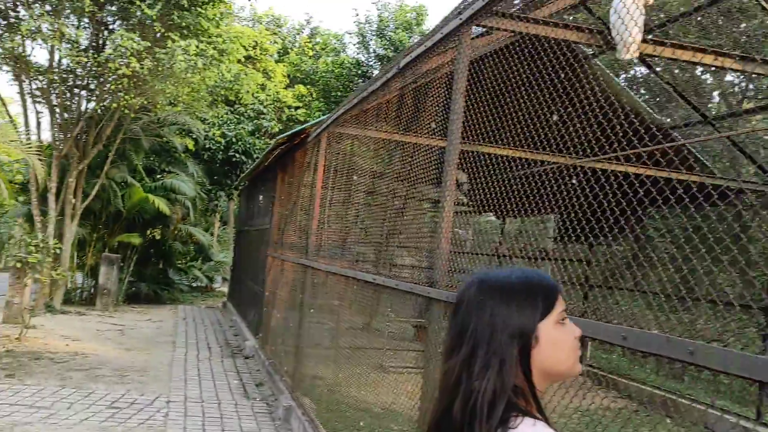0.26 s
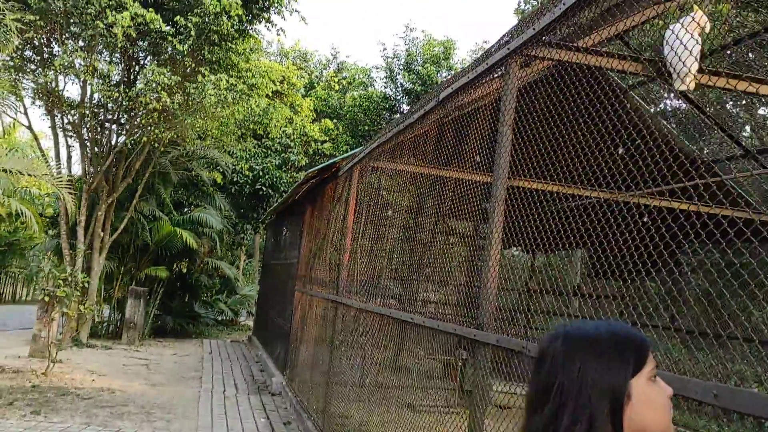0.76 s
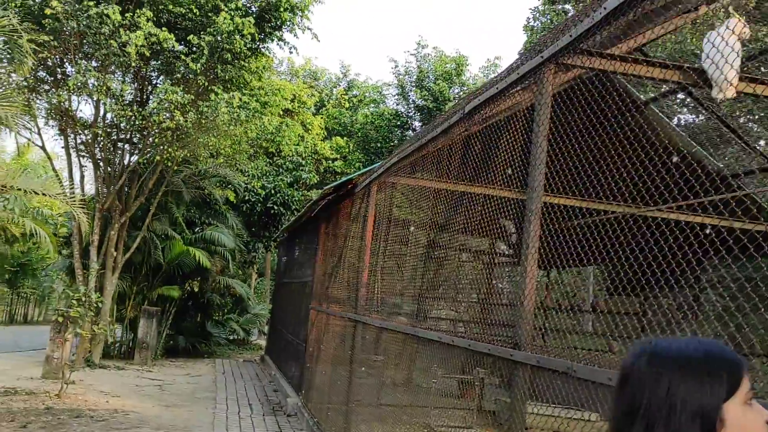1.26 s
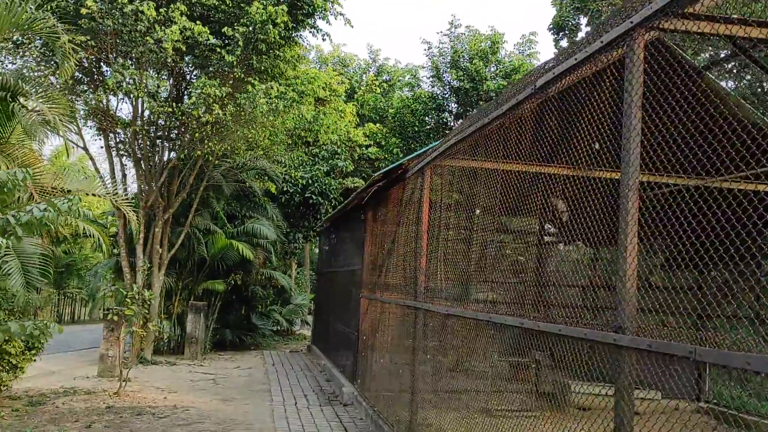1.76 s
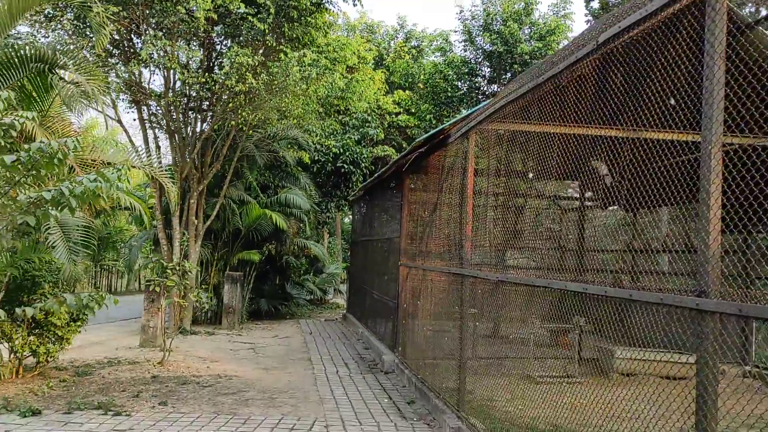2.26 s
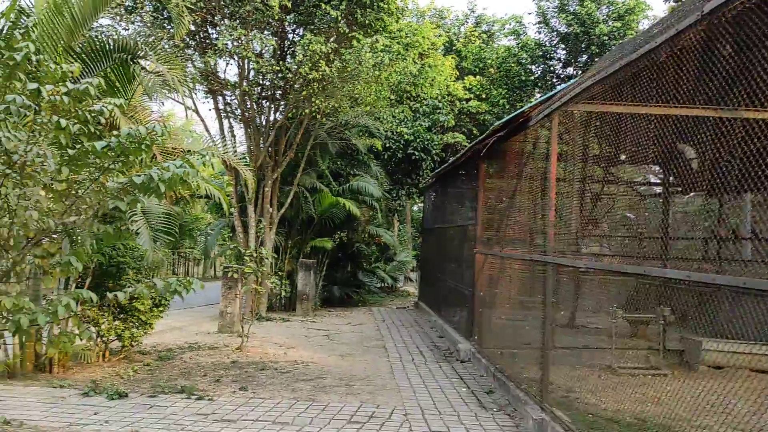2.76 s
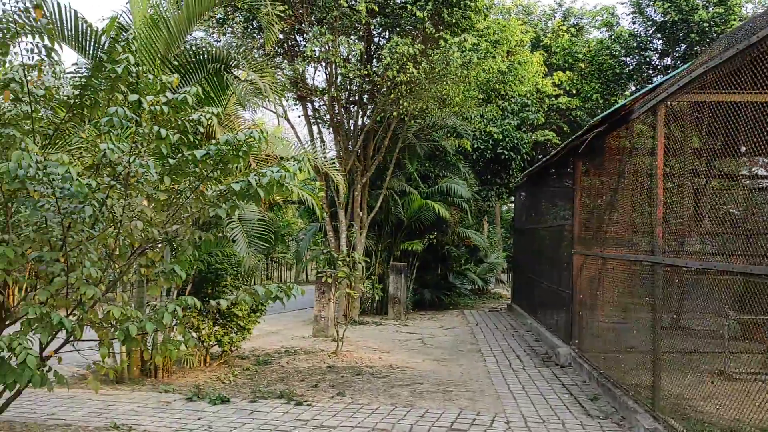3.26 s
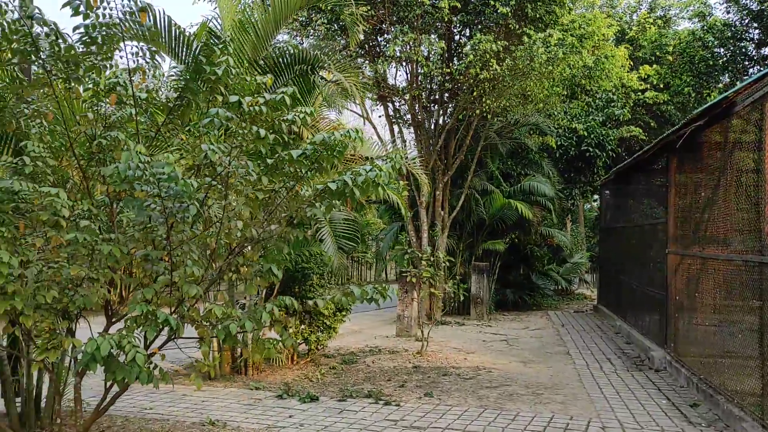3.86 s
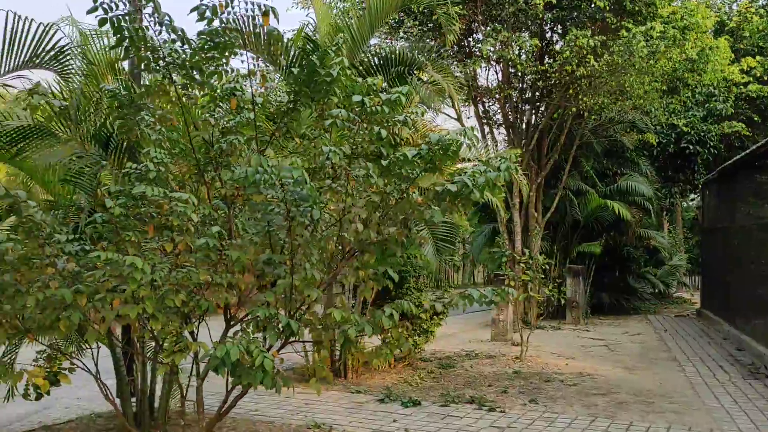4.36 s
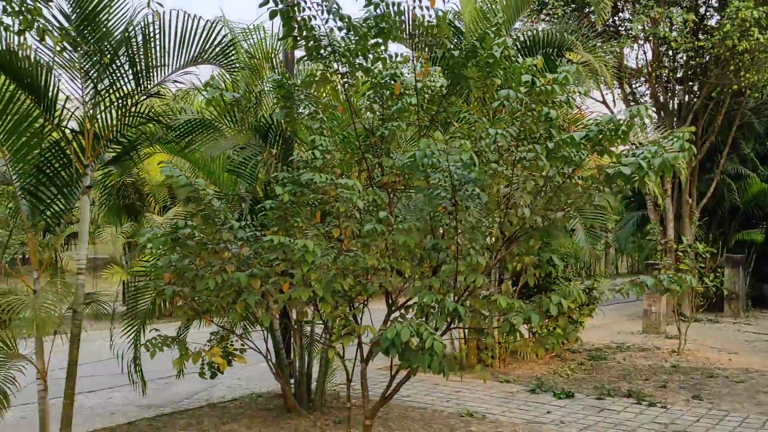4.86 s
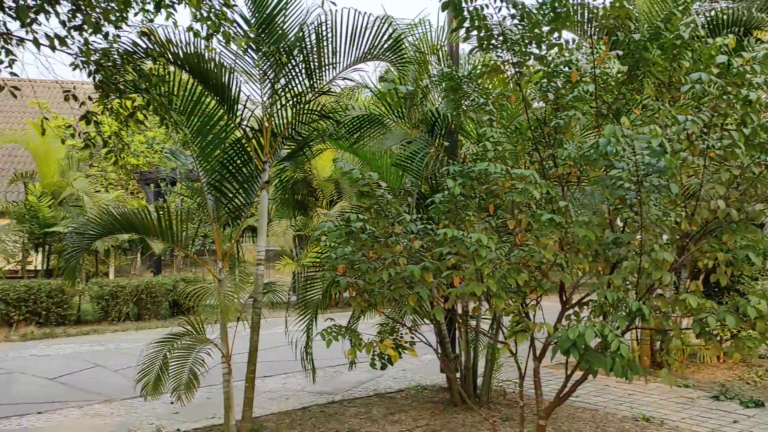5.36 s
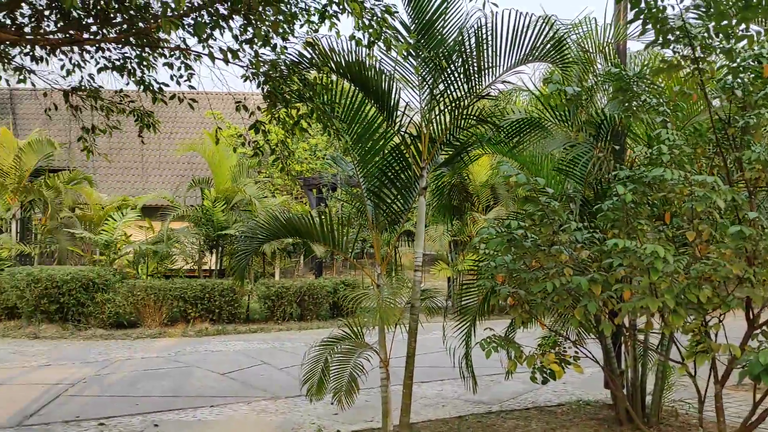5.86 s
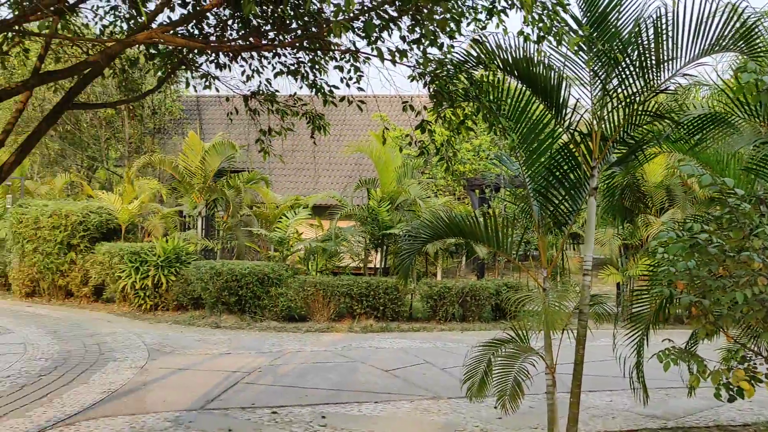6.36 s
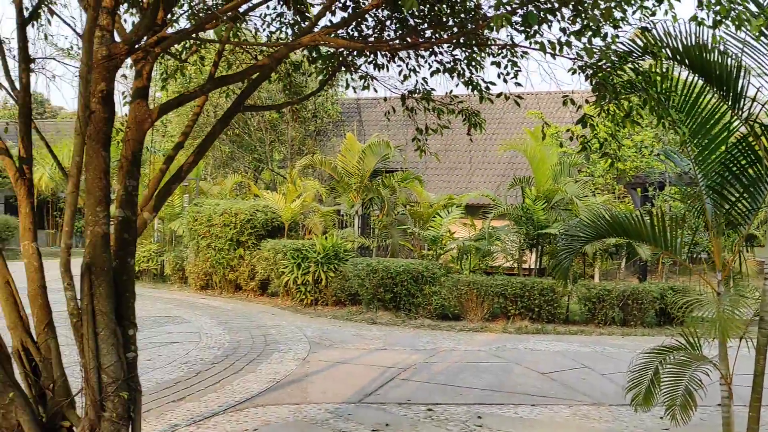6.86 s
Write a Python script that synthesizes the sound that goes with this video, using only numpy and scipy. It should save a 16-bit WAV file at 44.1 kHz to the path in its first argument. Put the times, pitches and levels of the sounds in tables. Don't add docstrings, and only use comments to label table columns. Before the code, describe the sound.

After a quiet start with one odd rising call and a sharp wire clack, a parrot gives six hoarse, falling squawks that ring round an aviary.

```python
import sys
import numpy as np
from scipy import signal
from scipy.fft import rfft, irfft
from scipy.io import wavfile
from scipy.ndimage import uniform_filter1d, map_coordinates

SR = 44100
rng = np.random.default_rng(int(sys.argv[2]) if len(sys.argv) > 2 else 0)


def to_wav(sig):
    pcm = np.clip(np.atleast_2d(sig), -1, 1) * 32767
    pcm = np.round(pcm).astype(np.int16)
    wavfile.write(sys.argv[1], SR, pcm.T)


def magnitude_from_level(level_db):
    exponent = np.asarray(level_db, float) / 20
    return 10 ** exponent


N = 313110

# start t/s, hold t/s, slide t/s, level/dB, entry f/Hz
SQUAWKS = [
    (2.877, 0.12, 0.076, -25, 2468),
    (3.799, 0.056, 0.094, -25, 2300),
    (4.543, 0.047, 0.069, -25, 2328),
    (5.475, 0.043, 0.076, -25.5, 2418),
    (6.27, .047, .066, -27.5, 2371),
    (7.041, 0.024, 0.14, -31, 2074),
]
# share of its length, level under effort/dB, f/Hz, roughness 0-1, brightness/dB per octave
SLIDE = [
    (.04, -3, 2234, .36, 0.5),
    (.3, -1.8, 2054, 0.42, 2),
    (.7, -0.5, 1660, .5, -1.3),
    (.99, -16, 1516, 1, 3.5),
]
# start t/s, length t/s, level/dB, from f/Hz, to f/Hz
WHISTLES = [
    (3.776, 0.022, -28.5, 3230, 2815),
    (4.513, 0.026, -27, 3330, 2920),
    (5.445, 0.028, -27, 3335, 2775),
    (6.236, 0.035, -33.5, 3320, 2746),
    (7.022, 0.031, -35.5, 3235, 2910),
]
# start t/s, length t/s, level at the end/dB, brightness/dB per octave
RASPS = [
    (0.16, 0.089, -48, -1),
    (1.369, 0.0365, -41.5, 17),
    (2.85, .033, -32.5, -7),
    (3.73, 0.041, -31, -2.5),
    (4.474, .044, -32.5, 0),
    (5.397, 0.049, -31.5, 5),
    (6.197, 0.046, -34.5, 2),
    (6.98, 0.052, -37, 3),
]
# t/s, level/dB, f/Hz, roughness 0-1
RISING_CALL = [
    (0.225, -59, 1641, 0.1),
    (0.255, -41, 1702, 0.15),
    (0.299, -42.5, 1728, 0.39),
    (0.33, -39.5, 2136, 0.28),
    (0.37, -38.5, 2385, 0.39),
    (0.4, -30.5, 2283, 0.53),
    (0.43, -28.5, 1711, 0.51),
    (0.47, -35.5, 1678, 0.92),
]
# t/s, level/dB, f/Hz, roughness 0-1
MUTTER = [
    (1.385, -64, 2054, 0.7),
    (1.426, -48.5, 2270, 0.6),
    (1.469, -53.5, 2277, 0.47),
    (1.54, -53.5, 2380, 0.98),
]
# start t/s, length t/s, level/dB, from f/Hz, to f/Hz
CHIRPS = [
    (1.104, .02, -43, 4400, 3230),
    (1.197, 0.055, -41.5, 3680, 3210),
    (1.366, .025, -47.5, 3620, 2870),
    (1.487, 0.014, -47.5, 3850, 4050),
]
# f/Hz, level/dB
THROAT = [(700, -13.5), (1300, -15.5), (1700, -8), (2300, -1), (3300, 7), (4400, 4.5), (5200, 2.5),
          (6000, 0), (7000, 4), (8600, 9.5), (9500, -7.5), (12000, -14), (16000, -28)]
# t/s, lead at the left/ms, left minus right level/dB
BEARING = [
    (0, 0.62, 16.5),
    (1.3, -0.37, -9),
    (2.9, 0.48, 6.5),
    (4.6, 0.43, 5),
    (5.5, 0.297, 4.5),
    (6.3, 0.19, 3),
    (7.1, 0.084, 4),
]
# t/s, peak level/dB, level below 1.2 kHz/dB, level above 5 kHz/dB, left minus right level/dB
TICKS = [(0.2306, -27.5, -13.5, -16, 8), (0.7794, -49, 1, 4, -1), (0.888, -7, -19.5, 5, -5),
         (0.8918, -40, -2, -2, -6), (1.0974, -36.5, -27, 9, -8), (1.705, -60.5, 7, 13, 17),
         (1.731, -56.5, -7, 8, -39), (1.7479, -40, -17, 4, 12.5), (1.9809, -45, -15, 1.5, 20),
         (2.0258, -41.5, -23, 6.5, -4), (2.399, -32.5, -9.5, 6.5, 12), (2.7694, -44, -11, 1, -2),
         (3.4887, -50, -15, 7, 12), (3.669, -59.5, -9, 20, 9), (3.9494, -24, -18.5, -17, 6.5),
         (4.1514, -32.5, -12, 0, 10), (4.1574, -34.5, -9.5, 7, -3), (4.2108, -45.5, -17, 16, 9),
         (4.7296, -28.5, -14.5, -5, 1), (5.1094, -40.5, -11, -12, -3.5), (5.153, -67, -27, 24.5, 25),
         (6.6972, -39.5, -30, 2, 3), (6.7794, -51.5, -15, 13, 5)]
# f/Hz, level/dB
WIRE = [
    [(150, -73), (300, 0), (520, 6), (750, 0), (1100, -22), (1500, -78)],
    [(900, -36), (1700, -4), (2900, -7), (4500, -15.5), (5500, -16.5)],
    [(4400, -51), (5400, 5.5), (8000, 14.5), (11000, -12.5), (16000, 12)],
]
WIRE_T60 = [0.048, 0.037, 0.023]
# t/s, left level/dB, right level/dB
NEAR_ECHOES = [(.0055, -5.5, 1), (.011, -1, -50), (.017, -13, -25), (.024, -8, -6), (.033, -9.5, -10)]
# f/Hz, time to fall by 60 dB t/s
SHED = [(300, 0.029), (1500, 0.64), (3500, 0.66), (8000, 0.49), (12000, 0.25)]
# start t/s, length t/s, level/dB, from f/Hz, to f/Hz
FAR_CALLS = [
    (1.24, 0.13, -52.5, 2862, 2170),
    (1.39, 0.034, -43, 3100, 2440),
    (1.9, 0.092, -59.5, 1803, 2063),
    (2.3, 0.098, -53, 1910, 1980),
    (2.73, 0.021, -55, 2150, 2060),
    (4.24, 0.06, -57.5, 2200, 1964),
    (4.96, 0.062, -55, 2035, 1916),
    (5.72, 0.056, -51, 2094, 2080),
]
# start t/s, length t/s, f/Hz, level/dB
COOING = [
    (3.646, 0.12, 1060, -63.5),
    (5.104, 0.65, 1097, -68.5),
]
# t/s, traffic level/dB, distant chatter level/dB
AROUND = [(0.0, -50.5, -57.5), (0.6, -50, -59), (1.1, -53.5, -51.5), (1.8, -52, -58.5),
          (2.45, -50.5, -56.5), (2.9, -51.5, -59.5), (3.4, -48, -61.5), (4.0, -49, -54.5), (4.6, -52, -64),
          (5.3, -53.5, -57), (6.3, -54, -57), (7.1, -52.5, -58)]
# f/Hz, level/dB per Hz
TRAFFIC = [(12, -37), (20, 32), (49, -2), (187, 3), (327, -3), (529, -12), (594, -7), (654, -13),
           (1360, -22.5), (2000, -49), (2600, -35), (4400, -120)]
# f/Hz, level/dB per Hz
CHATTER = [(500, -5), (1100, -1), (1400, -2.5), (2300, -1), (2700, -3.5), (3700, -8), (4400, -9.5),
           (6000, -5.5), (7300, -2.5), (9000, -9.5), (12000, -22.5), (16000, -10.5)]
# f/Hz, likeness 0-1
SAME = [(60, 0.35), (180, 1), (550, 0.14), (1650, 0.018), (4970, 0.054), (15000, 0.18)]
# f/Hz, level/dB
MIC = [(20, -4), (9500, 1), (10000, -8.5), (15600, -11), (16000, -59)]
# f/Hz, level/dB
LEFT_OVER_RIGHT = [(60, 5), (300, 5), (1000, 2.5), (2300, -1), (4000, -0.5), (5500, -3.5), (7200, -9),
                   (8200, 4.5), (9000, 7.5), (11000, 15), (15000, -6)]


def squawk(start, hold, slide, db, entry_hz):
    hold_hz, rough, bright_db = 2250, 0.25, -1.5
    rows = []
    for share, left in ((0, 1), (.4, .4), (1, 0)):
        pitch_hz = hold_hz + left * (entry_hz - hold_hz)
        rows.append((start + share * hold, db - 9 + 3 * share, pitch_hz, rough, bright_db))
    for share, under_db, *rest in SLIDE:
        rows.append((start + hold + share * slide, db + under_db, *rest))
    return rows


def whistle(start, length, db, from_hz, to_hz):
    knee, sag = 0.73, 0.379
    rough, bright_db = .28, -6
    knee_hz = from_hz + sag * (to_hz - from_hz)
    return [(start, db - 5, from_hz, rough, bright_db),
            (start + knee * length, db, knee_hz, rough, bright_db),
            (start + length, db + 5, to_hz, rough, bright_db)]


def yelps():
    length, db, from_hz, to_hz = 0.04, -51, 730, 3164
    table = [(row[0] - length, length, db, from_hz, to_hz) for row in WHISTLES]
    return glides(table, rough=.45, bright_db=-7)


def rasp(start, length, db, bright_db):
    hz, rough = 2400, .96
    return [(start + s, db + under_db, hz, rough, bright_db)
            for s, under_db in ((0, -20.5), (0.022, -2), (length, 0))]


def chirp(start, length, db, from_hz, to_hz):
    knee, lift, rough, bright_db = 0.476, 1.045, 0.32, 15
    return [(start, db, from_hz, rough, bright_db),
            (start + knee * length, db, from_hz * lift, rough, bright_db),
            (start + length, db - 2, to_hz, rough, bright_db)]


def voice(rows):
    s, *columns = np.transpose(rows)
    t = np.arange(s[0], s[-1], 1 / SR)
    effort_db, hz, rough, bright_db = (np.interp(t, s, c) for c in columns)
    rough = np.clip(rough, .15, 1)
    bright_db = bright_db + 0.37 * (effort_db + 30.0)
    order = np.arange(1, 10)[:, None]
    height = magnitude_from_level(read(THROAT, order * hz) + bright_db * np.log2(order))
    height = height * (order * hz < SR / 2)
    uneven_hz = hz * (1 + .14 * rough ** 2 * wobble(len(t), 400).real)
    turns = np.cumsum(uneven_hz) / SR
    shake = 1 + rough * np.array([wobble(len(t), 70 * k) for k in order[:, 0]])
    stack = (height * shake * np.exp(2j * np.pi * order * turns)).sum(0).real
    stack *= np.sqrt(2 / (height ** 2).sum(0) / (1 + rough ** 2))
    puffs = rng.standard_normal(len(t)) * abs(1 + wobble(len(t), 73))
    hiss = evened(coloured(puffs, lambda f: read(THROAT, f)))
    hiss_share = rough ** 4
    edges = np.clip(np.minimum(t - t[0], t[-1] - t) / 0.0036, 0, 1)
    sound = np.sqrt(1 - hiss_share) * stack + np.sqrt(hiss_share) * hiss
    return s[0], magnitude_from_level(effort_db) * edges * sound


def glides(table, rough, bright_db):
    line = np.zeros(N)
    for s, length, db, from_hz, to_hz in table:
        first = (s, db, from_hz, rough, bright_db)
        last = (s + length, db, to_hz, rough, bright_db)
        add(line, *voice([first, last]))
    return line


def birds():
    line = np.zeros(N)
    for note, table in ((rasp, RASPS), (whistle, WHISTLES), (squawk, SQUAWKS), (chirp, CHIRPS)):
        for row in table:
            add(line, *voice(note(*row)))
    for rows in (RISING_CALL, MUTTER):
        add(line, *voice([(*row, -1.5) for row in rows]))
    return line + yelps()


def placed(line):
    s, lead_ms, pan_db = np.transpose(BEARING)
    t = np.arange(N) / SR
    side = np.array([[.5], [-.5]])
    at = np.arange(N) + side * np.interp(t, s, lead_ms) * SR / 1000
    return map_coordinates(line, at[None], order=5) * magnitude_from_level(side * np.interp(t, s, pan_db))


def ticks():
    lead_s = -.00025
    out, t = np.zeros((2, N)), np.arange(2048) / SR
    onset = np.minimum(t / 0.00016, 1) ** 2
    for s, peak_db, low_db, top_db, pan_db in TICKS:
        tick = np.zeros(2048)
        for colour, t60, db in zip(WIRE, WIRE_T60, (low_db, 0, top_db)):
            scrape = coloured(rng.standard_normal(2048), lambda f: read(colour, f))
            part = scrape * magnitude_from_level(-60 * t / t60) * onset
            tick += magnitude_from_level(peak_db + db) * part / abs(part).max()
        add(out[0], s - .001 - lead_s / 2, tick * magnitude_from_level(pan_db / 2))
        add(out[1], s - .001 + lead_s / 2, tick * magnitude_from_level(-pan_db / 2))
    return out


def near(x):
    out = np.zeros((2, N))
    for k, (s, left_db, right_db) in enumerate(NEAR_ECHOES):
        add(out[0], s, (-1) ** k * magnitude_from_level(left_db) * x)
        add(out[1], s * 1.06, (-1) ** k * magnitude_from_level(right_db) * x)
    return out


def shed(x):
    taps = np.zeros((2, SR))
    at = np.arange(600, SR - 20, 20) + rng.integers(0, 20, (2, (SR - 601) // 20))
    np.put_along_axis(taps, at, rng.choice([-1., 1.], at.shape), 1)
    hz, t, z = signal.stft(taps, SR, nperseg=256)
    decay = magnitude_from_level(-60 * t / read(SHED, hz)[:, None])
    tail = signal.istft(z * decay, SR, nperseg=256)[1]
    return signal.fftconvolve(x[None], tail / np.linalg.norm(tail[0]), axes=1)[:, :N]


def far_cages():
    return glides(FAR_CALLS, rough=.8, bright_db=-3)


def cooing():
    out = np.zeros(N)
    for s, length, hz, db in COOING:
        t = np.arange(0, length, 1 / SR)
        add(out, s, magnitude_from_level(db) * np.sin(2 * np.pi * hz * t) * signal.windows.tukey(len(t), .3))
    return out


def traffic():
    return murmur(TRAFFIC, column=1, patchy_db=0.9)


def chatter():
    return murmur(CHATTER, column=2, patchy_db=2.0)


def murmur(spectrum, column, patchy_db):
    frames, hz = N // 256 + 5, np.fft.rfftfreq(1024, 1 / SR)
    a, b, c, d, patches = rng.standard_normal((frames, 513, 5)).T
    patches = evened(uniform_filter1d(uniform_filter1d(patches, 20, 0), 14, 1))
    same = np.clip(read(SAME, hz), -1, 1)[:, None]
    left = a + 1j * b
    right = same * left + np.sqrt(1 - same ** 2) * (c + 1j * d)
    z = np.array([left, right]) * magnitude_from_level(read(spectrum, hz)[:, None] + patchy_db * patches)
    noise = signal.istft(z, nperseg=1024, noverlap=768)[1][:, :N]
    rows = np.transpose(AROUND)
    level_db = np.interp(np.arange(N) / SR, rows[0], rows[column])
    return magnitude_from_level(level_db) * evened(noise)


def evened(x):
    return x / np.sqrt(np.mean(abs(x) ** 2) + 1e-20)


def read(points, hz):
    f, value = np.transpose(points)
    return np.interp(np.log(hz + 1), np.log(f + 1), value)


def add(mix, s, sound):
    part = mix[round(s * SR):][:len(sound)]
    part += sound[:len(part)]


def coloured(x, db_at):
    size = x.shape[-1]
    return irfft(rfft(x) * magnitude_from_level(db_at(np.fft.rfftfreq(size, 1 / SR))), size)


def wobble(size, hz):
    z = rng.standard_normal((size + 999, 2)) @ [1, 1j]
    b, a = signal.butter(3, min(2 * hz / SR, .9))
    return evened(signal.lfilter(b, a, z)[999:])


def scene():
    line, wire = birds(), ticks()
    wire_mono = wire.mean(0)
    stirred = wobble(N, 200).real * np.sqrt(2)
    echoes = shed(magnitude_from_level(-7.0) * line * stirred + magnitude_from_level(-15.5) * wire_mono + far_cages())
    echoes += near(line + 0.36 * wire_mono)
    return magnitude_from_level(3.5) * placed(line) + wire + echoes + traffic() + chatter() + cooing()


def gated(x):
    from_hz, to_hz, under_db, cut_db = 900, 9000, 4.4, -24
    hz, _, z = signal.stft(x, SR, nperseg=2048)
    power = abs(z) ** 2
    db = 10 * np.log10(power.mean(0) + 1e-20)
    weak = uniform_filter1d(db, size=8, axis=0) < uniform_filter1d(db, size=70, axis=0) - under_db
    weak &= ((hz > from_hz) & (hz < to_hz))[:, None]
    loud_db = 10 * np.log10(power.sum((0, 1)) + 1e-20)
    weak[:, 2:] &= loud_db[2:] - loud_db[:-2] < 14
    return signal.istft(z * magnitude_from_level(cut_db * weak), SR, nperseg=2048)[1][:, :N]


def top_cut(x):
    return signal.sosfilt(signal.butter(12, 16750, fs=SR, output="sos"), x)


def record(dry):
    held = .8 * np.tanh(dry / .8)
    left = coloured(held[0], lambda f: read(MIC, f) + read(LEFT_OVER_RIGHT, f) / 2)
    right = coloured(held[1], lambda f: read(MIC, f) - read(LEFT_OVER_RIGHT, f) / 2)
    mix = gated(np.array([left, right]))
    return top_cut(mix)


dry = scene()
out = record(dry)
to_wav(out)
```